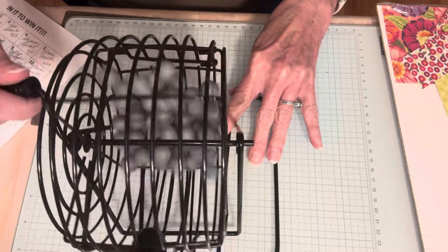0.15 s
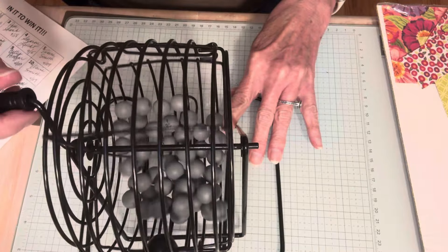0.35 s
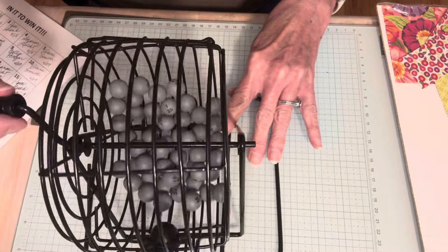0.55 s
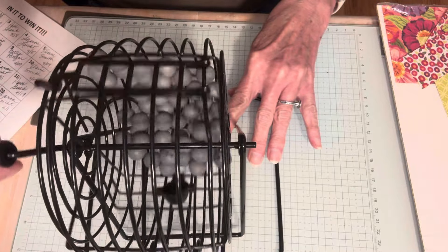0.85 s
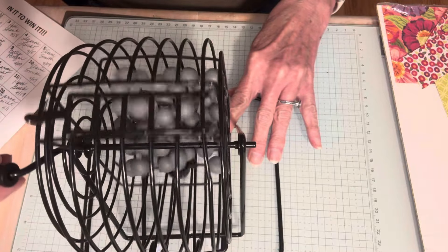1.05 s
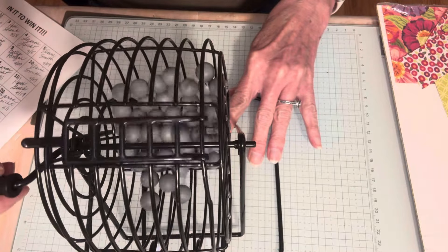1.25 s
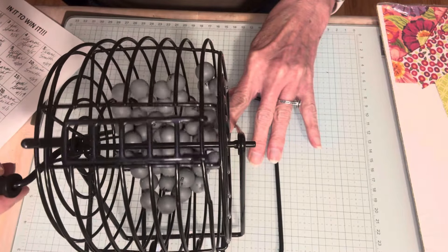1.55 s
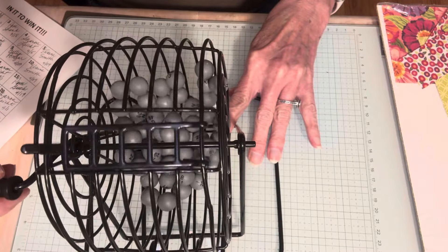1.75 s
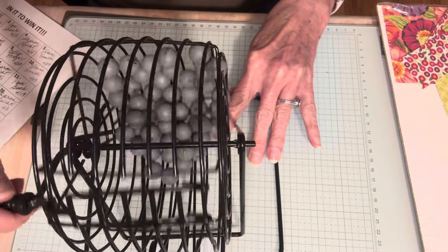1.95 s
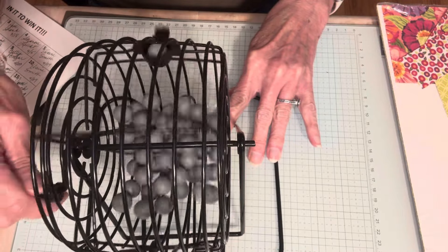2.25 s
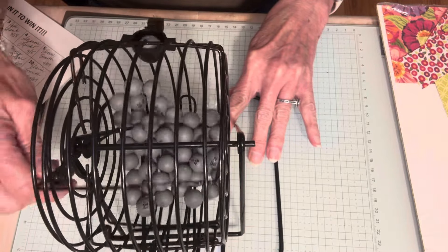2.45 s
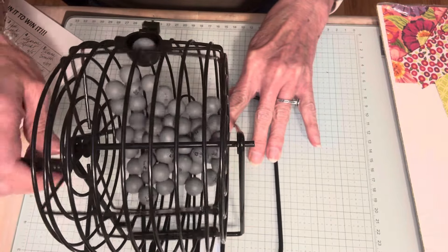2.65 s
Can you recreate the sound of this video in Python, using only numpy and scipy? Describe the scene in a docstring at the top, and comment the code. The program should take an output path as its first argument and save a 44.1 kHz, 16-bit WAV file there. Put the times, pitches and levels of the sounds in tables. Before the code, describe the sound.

Small hard balls rattle and tumble in a hand-cranked wire cage, in four clattering bursts

```python
"""Small hard balls tumble in a hand-cranked wire cage on a table, close to a stereo microphone in a small room.
Over a low, steady room sound, four crank pushes each set off a pour: at once, near 0.7, 1.9 and 2.6 s.
Each pour is a crowd of random collisions that rings cage and wires and drums stand and table.
Short runs of knocks come as the later pours begin and after the second thins out; throughout, single balls
snap against the bars as decaying sine ticks with a noisy crack."""
import sys
import numpy as np
from scipy import signal
from scipy.fft import rfft, irfft, next_fast_len
from scipy.io import wavfile

SR = 44100
rng = np.random.default_rng(int(sys.argv[2]) if len(sys.argv) > 2 else 0)


def to_wav(sig):
    """Store sig (one row per channel, or 1-D mono) as 16-bit WAV at the path in sys.argv[1].

    Samples outside -1..1 are clipped; the rate is SR.
    """
    pcm = np.clip(np.atleast_2d(sig), -1, 1) * 32767
    pcm = np.round(pcm).astype(np.int16)
    wavfile.write(sys.argv[1], SR, pcm.T)  # frames by channels


N = 123479
FFT_SIZE = next_fast_len(N + SR // 2)
HZ = np.fft.rfftfreq(FFT_SIZE, 1 / SR)


def amp(db):
    """Decibels to gain."""
    return 10 ** (np.asarray(db) / 20)


def along(points, hz):
    """Read (Hz, value) points on a log frequency axis."""
    point_hz, value = np.transpose(points)
    return np.interp(np.log(hz + 1), np.log(point_hz + 1), value)


def unit(x):
    """Scale to rms 1."""
    return x / np.sqrt(np.mean(np.abs(x) ** 2) + 1e-20)


def decay(t, t60_s):
    """Exponential decay, 60 dB down after t60_s."""
    return np.exp(-np.log(1000) * t / t60_s)


def colour(points):
    """Minimum-phase response with the given (Hz, dB) shape, by folding its cepstrum."""
    cepstrum = irfft(np.log(amp(along(points, HZ))), FFT_SIZE)
    cepstrum[1:FFT_SIZE // 2] *= 2
    cepstrum[FFT_SIZE // 2 + 1:] = 0
    return np.exp(rfft(cepstrum))


def resonance(hz, width_hz):
    """Causal response of one damped mode, 1 at its peak."""
    damping = 1j * HZ * width_hz
    return damping / (hz * hz - HZ ** 2 + damping)


# channel likeness: freq_hz, likeness (clipped to 0-1 in use)
LIKENESS = [(150, 0.8), (700, 0.31), (1300, 0.84), (2000, .5), (2500, 0.69), (3000, 0.4641), (4500, 0.29),
            (6200, -0.58), (8000, 3.8), (8900, 7.35), (15000, 6)]
# phase lead of left over right: freq_hz, lead_rad
LEFT_LEAD = [(1900, 0), (2300, 3.5), (3000, 2.5), (4500, 1.5), (7300, 8), (8300, 8), (9000, 9),
             (10100, 9.5), (11000, 11.5), (12900, 12), (14000, 22.5), (15200, -1), (16000, 8)]
# left re right: freq_hz, balance_db
LEFT_BALANCE = [(150, -2.5), (700, -2.5), (1200, 0.5), (1700, -7.5), (2900, -0.5), (5000, -5.5),
                (7800, -0.5), (8800, 0)]


def microphones(pair):
    """Mix two unrelated spectra into left and right with set coherence, phase and balance per frequency."""
    turn = np.arccos(np.clip(along(LIKENESS, HZ), 0, 1)) / 2
    common = pair[0] * np.cos(turn)
    apart = pair[1] * np.sin(turn)
    # half of the difference on each side
    lean = amp(along(LEFT_BALANCE, HZ) / 2) * np.exp(.5j * along(LEFT_LEAD, HZ))
    return irfft(np.array([(common + apart) * lean, (common - apart) / lean]), FFT_SIZE)[:, :N]


# spectrum shape of the still air: freq_hz, relative_db
AIR_COLOUR = [(25, -21.5), (40, -4.5), (100, 0), (135, -4), (230, -3), (270, -11.5), (590, -7.5),
              (800, -16), (1700, -21.5), (3000, -28.5), (6000, -43.5), (10000, -73.5)]
AIR_RMS_DB = -55.5


def still_air():
    """Low, steady room background: shaped Gaussian noise."""
    noise = rfft(rng.standard_normal((2, FFT_SIZE)))
    return amp(AIR_RMS_DB) * unit(microphones(noise * amp(along(AIR_COLOUR, HZ))))


# reverberation time: freq_hz, t60_s
ROOM_T60 = [(200, 0.48), (1500, 0.18), (4000, 0.17), (9000, 0.13), (13000, 0.098)]


def room_tail():
    """Two unrelated noise tails of unit energy; the treble dies first."""
    hz, t, z = signal.stft(rng.standard_normal((2, SR // 3)), SR, nperseg=256)
    t60_s = along(ROOM_T60, hz)[:, None]
    fading = z * amp(-60 * t / t60_s) / np.sqrt(t60_s)
    tail = signal.istft(fading, SR, nperseg=256)[1]
    return tail / np.linalg.norm(tail, axis=1, keepdims=True)


# single balls on a bar: start_s, level_db, pitch_hz, ring_t60_s, left_right_db (direct sound), crack_re_ring_db
BAR_SNAPS = [(0.0112, -19, 5600, 0.0036, 3, -9), (0.4848, -25.5, 3800, 0.0089, -8, -4.5),
             (0.7395, -34.5, 4500, .003, -4, 2), (0.7938, -15, 4490, 0.0033, -1, -2),
             (0.8282, -19, 5520, .004, 0, -4), (0.935, -11, 6550, .003, 0, -4),
             (1.0076, -4, 4410, 0.012, -8, -12), (1.0482, -2, 5430, 0.0072, 0, -7),
             (1.1517, -17, 4140, .005, -3, -13), (1.162, -21, 4490, 0.0042, -3, -14),
             (1.3056, -6, 5960, 0.0041, -2, -6), (1.509, -16.5, 7300, 0.0056, -11, 0),
             (1.637, -33, 6860, 0.0037, 2.5, 0), (2.021, -10, 6550, 0.0042, 4, -2),
             (2.2246, -18, 6210, 0.0046, 0, -10), (2.297, -6, 2950, 0.0047, 0, -2),
             (2.493, -35, 5130, 0.0042, 5, 7), (2.5124, -28, 3100, 0.0033, -9, 8.5)]
SNAP_RISE_S, SNAP_ROOM_DB = 0.00074, -6


def snaps():
    """Single balls on the bars: sine plus band noise, fast rise, short decay, weak room answer."""
    out = np.zeros((2, FFT_SIZE))
    t = np.arange(SR // 30) / SR
    crack_band = signal.butter(2, [1800, 8000], "band", fs=SR, output="sos")
    for start_s, level_db, pitch_hz, t60_s, pan_db, crack_db in BAR_SNAPS:
        crack = unit(signal.sosfilt(crack_band, rng.standard_normal(len(t))))
        ring = np.sin(2 * np.pi * pitch_hz * t)
        tick = (ring + amp(crack_db) * crack) * decay(t, t60_s) * (1 - np.exp(-t / SNAP_RISE_S))
        path = amp(SNAP_ROOM_DB) * room_tail()
        path[:, 0] += amp([pan_db / 2, -pan_db / 2])  # direct sound
        heard = amp(level_db) * signal.fftconvolve(tick[None], path, axes=1)
        start = round(start_s * SR)
        out[:, start:start + heard.shape[1]] += heard
    return out[:, :N]


# short runs of collisions: start_s, level_db, length_s
SETTLE_RUNS = [(0.793, -2.5, .002), (0.845, -3, 0.021), (1.403, -4, 0.0034), (1.409, 5, 0.028),
               (1.469, -6, 0.0065), (1.507, -2, 0.0018), (1.637, -8.5, .002), (1.925, -11, 0.011),
               (1.962, -16, 0.0065), (2.012, 2, .015), (2.669, -13.5, .006), (2.697, -3, 0.0026)]
# one level_db per band: clatter, treble, drumming, boom
SETTLE_BAND_LEVELS = [-7.5, -2.5, -27, -39]


def settle(start_s, level_db, length_s, count=6):
    """One ball drops into place and nudges its neighbours: a weakening run of collisions."""
    delay = (np.arange(count) + rng.random(count)) / count
    size = unit(np.exp(-delay)) / np.sqrt(count)  # unit energy per run
    when_s = start_s + length_s * (delay - delay[0])
    return when_s, amp(level_db) * np.outer(amp(SETTLE_BAND_LEVELS), size)


# one table per pour, before the band offsets below: time_s, clatter_db, treble_re_clatter_db
POUR_LEVELS = [
    [(0.0, -40, -7.5), (0.048, -41.5, -2), (0.132, -32.5, 6.5), (0.14, -28, -2.5), (0.174, -28.5, 10),
     (0.18, -24, 3.5), (0.24, -23.5, 2), (0.386, -30, 4.5), (0.472, -42.5, 0), (0.574, -65, -16),
     (0.6, -66.5, -10)],
    [(0.735, -58, -7), (0.772, -50, -12.5), (0.81, -42.5, 10), (0.826, -44, -13.5), (0.858, -35, 5.5),
     (0.92, -40, 5), (1.014, -32, 8), (1.1, -31.5, 7), (1.168, -34, 7.5), (1.21, -30.5, 5.5),
     (1.254, -39.5, 6), (1.32, -39.5, 6), (1.37, -45.5, 1), (1.39, -56.5, -16)],
    [(1.9, -61, -1.5), (1.93, -50, -20.5), (2.006, -48, 8.5), (2.028, -31.5, 6.5), (2.258, -23.5, 5.5),
     (2.275, -30.5, 9), (2.295, -25, 1), (2.416, -34, 7), (2.448, -35, -2.5), (2.462, -39, 0),
     (2.6, -56.5, -14.5)],
    [(2.632, -53, -2.5), (2.66, -51, -14), (2.696, -43, -0.5), (2.774, -37.5, 5.5), (2.8, -41, 4)],
]
# one row per pour, re its shake level: drumming_db (before DRUM_DB), boom_db
POUR_SHAKES = [(-19, -29.5), (-17.5, -20.5), (-17, -18.5), (-18, -25)]
FULL_HITS_PER_S, FULL_DB = 950, -26  # collision rate at the level of a full pour
CROWDING = .52  # power by which the rate follows the level
SHAKE_GROWS = 1.144  # power by which the bass follows the level
SIZE_SCATTER_DB = 4.5  # scale of the exponential spread of strengths
LEAD_S = .008  # collisions come before their ring peaks
CLATTER_DB, TREBLE_DB, DRUM_DB = 1.5, 1, 5.5


def pour(rows, drum_db, boom_db):
    """Random collisions (times, strength per band); a heavier pour has both more and harder ones."""
    time_s, level_db, treble_db = np.transpose(rows)
    t = np.arange(time_s[0], time_s[-1] + LEAD_S, 1 / SR)
    rate = FULL_HITS_PER_S * amp(CROWDING * (np.interp(t, time_s, level_db) - FULL_DB))
    passed = np.cumsum(rate) / SR
    count = min(int(passed[-1]), 4000)
    jitter, luck = rng.random((2, count))
    when_s = np.interp(np.arange(count) + 2 * jitter - .5, passed, t)
    size = unit(amp(SIZE_SCATTER_DB * -np.log(1 - luck * .95)))
    size = size * np.sqrt(SR / np.interp(when_s, t, rate))  # power independent of rate
    shake_db = FULL_DB + SHAKE_GROWS * (level_db - FULL_DB)
    bands_db = [level_db + CLATTER_DB, level_db + treble_db + TREBLE_DB,
                shake_db + drum_db + DRUM_DB, shake_db + boom_db]
    return when_s - LEAD_S, size * amp([np.interp(when_s, time_s, db) for db in bands_db])


def collisions():
    """All collisions of pours and settles: sample index, strength per band, nearest pour."""
    hits = [pour(rows, *shake) for rows, shake in zip(POUR_LEVELS, POUR_SHAKES)]
    hits += [settle(*row) for row in SETTLE_RUNS]
    when_s = np.concatenate([times for times, _ in hits])
    size = np.hstack([strengths for _, strengths in hits])
    middle_s = np.array([(rows[0][0] + rows[-1][0]) / 2 for rows in POUR_LEVELS])
    nearest_pour = np.concatenate([np.full(len(times), np.argmin(np.abs(middle_s - times.mean())))
                                   for times, _ in hits])
    at = np.clip(np.round(when_s * SR).astype(int), 0, FFT_SIZE - 1)
    return at, size, nearest_pour


def blows(at, strength):
    """Spectrum of a train of impulses."""
    return rfft(np.bincount(at, strength, FFT_SIZE))


def modes(rows):
    """Response of a body with (Hz, width Hz, dB) modes, struck softly: low-passed at 900 Hz, rms 1."""
    return unit(sum(amp(db) * resonance(hz, width_hz) for hz, width_hz, db in rows) / (1 + 1j * HZ / 900))


# modes of the stand: freq_hz, width_hz, relative_db
STAND_MODES = [(328, 15, 1), (355, 28, -1), (480.2, 15, 3), (726, 38, 4.5)]
# modes of the table top: freq_hz, width_hz, relative_db
TABLE_MODES = [(55, 23, -11.5), (154.1, 11, 6)]
STAND_APART_DB = -3.5  # gain of the second spectrum, which sets the microphones apart


def stand_and_table(at, drum, boom, signs):
    """Collisions drive the low modes of stand and table, with separate random signs per spectrum."""
    stand, table = modes(STAND_MODES), modes(TABLE_MODES)
    low = np.array([blows(at, drum * sign) * stand + blows(at, boom * sign) * table for sign in signs])
    return low * amp([[0], [STAND_APART_DB]])


# broad cage resonances, shifting with where the heap lies; one table per pour: freq_hz, width_hz, lift_db
CAGE_MODES = [
    [(990, 100, 0.5), (1684, 227, 6), (2172, 46, 5), (2925, 80, 7.5), (4200, 240, 3), (5430, 83, 3)],
    [(1145, 83, 5.5), (1778, 100, 9), (2120, 86, 3.5), (2926, 153, 8.5), (3460, 54, 6), (4300, 530, 3),
     (5430, 520, 2)],
    [(853, 150, 5), (1857, 160, 6), (2275, 52, -2.5), (2422, 60, 10.5), (2960, 170, 9), (5400, 130, 1.5)],
    [(980, 140, 6), (1885, 200, 6), (2900, 200, 10), (4040, 320, 6)],
]
# hollow clatter of a collision: freq_hz, relative_db
CLATTER_COLOUR = [(200, -43.5), (540, -13.5), (750, -4.5), (1000, 0), (1300, -2.5), (1480, -4.5),
                  (1800, -3), (2200, 0), (2540, -11), (2800, -1.5), (3400, -4.5), (6000, -36.5),
                  (12000, -66)]
# hard treble of a collision: freq_hz, relative_db
TREBLE_COLOUR = [(600, -44.5), (1800, -27.5), (2560, -15), (2850, 2), (3260, -11), (3800, 0), (4800, -3),
                 (5400, 1), (8200, 0.5), (9400, -5.5), (10500, 0), (12200, 3), (13600, 2), (14500, -12.5),
                 (15700, -12.5)]
CAGE_DB = -2  # clatter level before the cage lifts it


def cage(rows, stretch):
    """Broad resonances in series boost or cut the sound; stretch scales their pitches."""
    return np.prod([1 + (amp(db) - 1) * resonance(hz * stretch, width_hz) for hz, width_hz, db in rows], axis=0)


def struck_cage(at, clatter_size, treble_size, nearest_pour, stretch):
    """Coloured collisions of one place through the cage as it rings in each pour."""
    clatter = amp(CAGE_DB) * unit(colour(CLATTER_COLOUR))
    treble = unit(colour(TREBLE_COLOUR))
    struck = 0
    for p, rows in enumerate(CAGE_MODES):
        here = nearest_pour == p
        hit = blows(at, clatter_size * here) * clatter + blows(at, treble_size * here) * treble
        struck = struck + hit * cage(rows, stretch)
    return struck


# modes of the cage wires: freq_hz, level_db (re click, before WIRE_DB), t60_s
WIRE_MODES = [(1050, -1, .7), (1597, 0.5, 0.27), (1692, 4.5, 0.1), (1766, -3, .3), (1930, 2, 0.18),
              (2464, 11, 0.18), (3036, 2.5, 0.14), (3420, 0.5, .17), (3850, 2.5, .2), (5226, 3.5, .11),
              (6750, 0.5, .15), (7760, 5.5, .14), (8290, 8, .14), (11396, 0.5, 0.11), (11600, 0.5, 0.14),
              (11960, -0.5, .12), (12550, 4.5, .11), (12770, 4, 0.095)]
WIRE_DB = 2
PING_WIDTH_HZ, PING_DB = 280, 0


def wire_ring(ping_hz):
    """A hit plus the wire modes in random polarity and the place's own short ping, rms 1."""
    ring = 1 + amp(PING_DB) * resonance(ping_hz, PING_WIDTH_HZ)
    for hz, level_db, t60_s in WIRE_MODES:
        width_hz = np.log(1000) / np.pi / t60_s
        ring = ring + rng.choice([-1., 1.]) * amp(level_db + WIRE_DB) * resonance(hz, width_hz)
    return unit(ring)


CLICK_T60_S, ROOM_DB = 0.0073, 4  # direct click; room answer re click


def spot():
    """Response of one place in the cage: a short noise click and the room's answer."""
    tail = room_tail()
    t = np.arange(tail.shape[1]) / SR
    click = rng.standard_normal(tail.shape) * decay(t, CLICK_T60_S)
    click = click / np.linalg.norm(click, axis=1, keepdims=True)
    return unit(rfft(click + amp(ROOM_DB) * tail, FFT_SIZE))


# range of the pings, spread over the places: lowest_hz, highest_hz
PING_RANGE = (1800, 11050)
DETUNE = .032  # largest share by which cage resonances differ from place to place


def tumbling(count=6):
    """Every collision strikes one of several places, rings cage and wires there, shakes stand and table."""
    at, size, nearest_pour = collisions()
    place = rng.integers(count, size=FFT_SIZE)[at]
    signs = rng.choice([-1, 1], (3, FFT_SIZE))[:, at]
    pings_hz = np.geomspace(*PING_RANGE, count)
    stretches = 1 + DETUNE * rng.permutation(np.linspace(-1, 1, count))
    sound = stand_and_table(at, size[2], size[3], signs[1:])
    for k in range(count):
        here = signs[0] * (place == k)
        struck = struck_cage(at, size[0] * here, size[1] * here, nearest_pour, stretches[k])
        sound = sound + struck * wire_ring(pings_hz[k]) * spot()
    return microphones(sound)


def scene():
    """The cage in its room."""
    return still_air() + snaps() + tumbling()


TOP_HZ = 15700


def record(dry):
    """The recorder rolls off steeply at its band limit."""
    return irfft(rfft(dry, FFT_SIZE) / (1 + (HZ / TOP_HZ) ** 300), FFT_SIZE)[:, :N]


dry = scene()
out = record(dry)
to_wav(out)
```